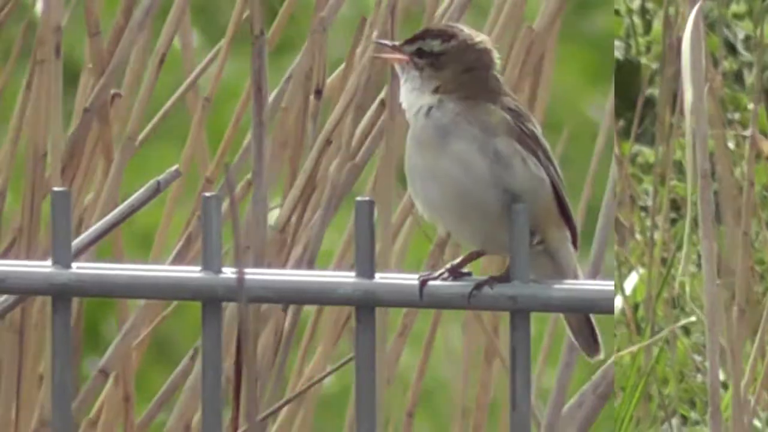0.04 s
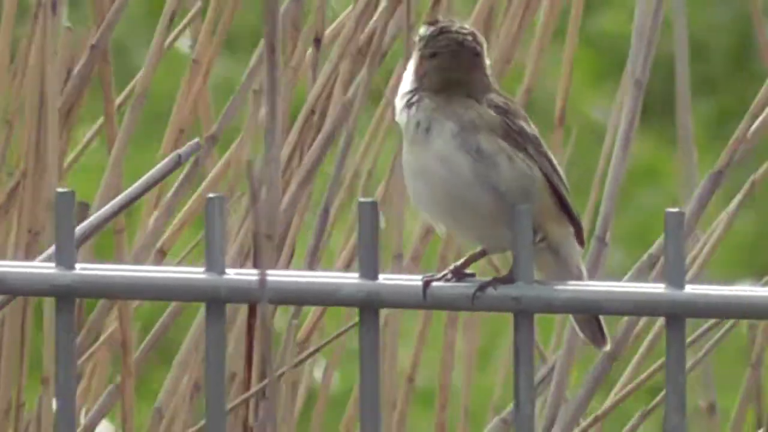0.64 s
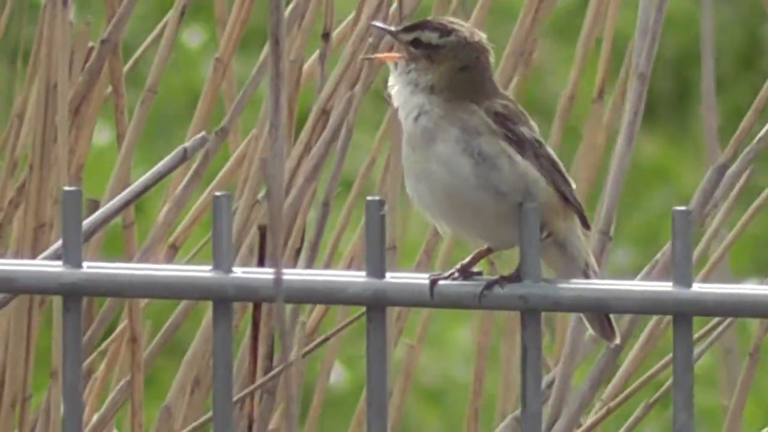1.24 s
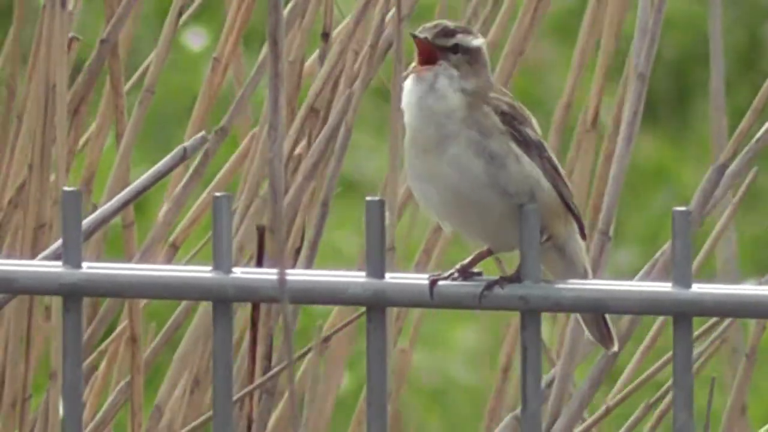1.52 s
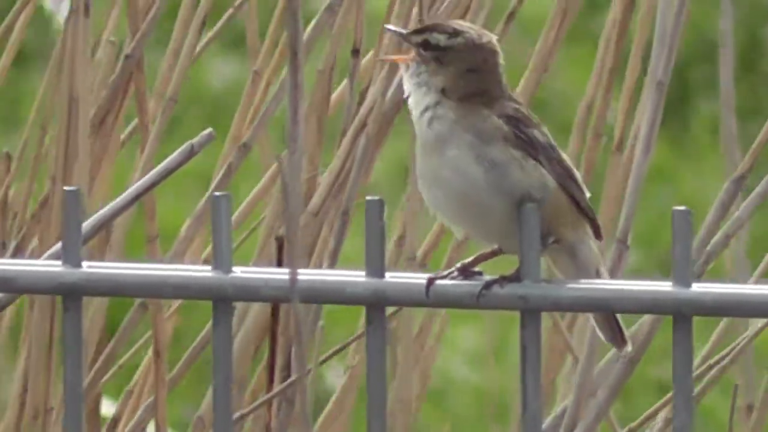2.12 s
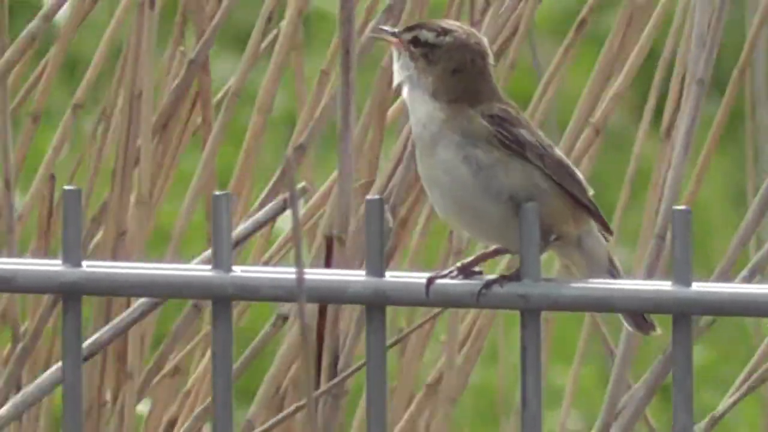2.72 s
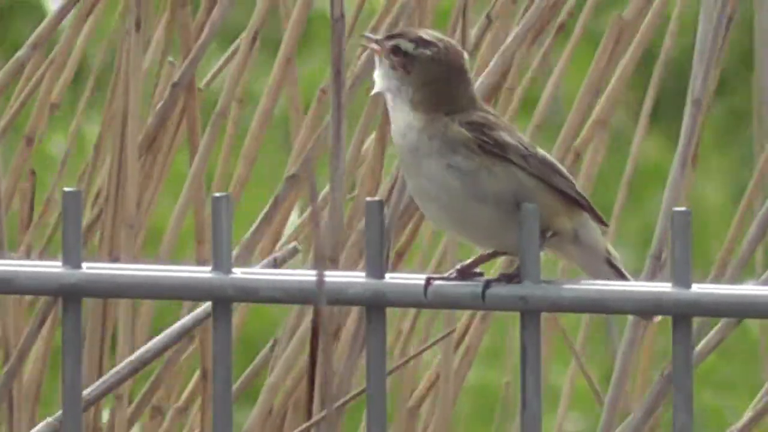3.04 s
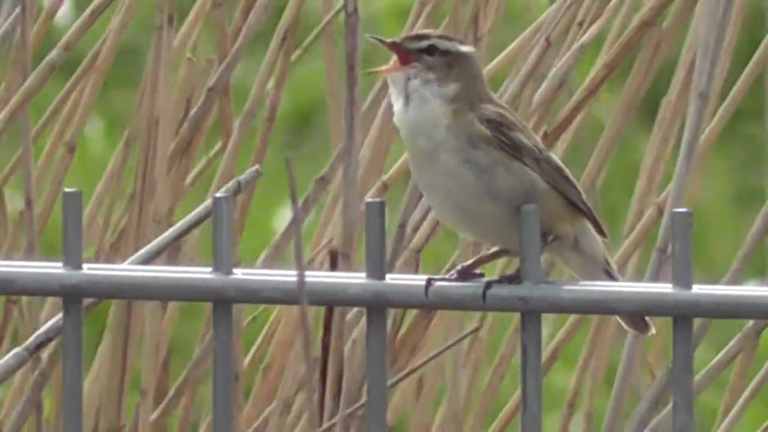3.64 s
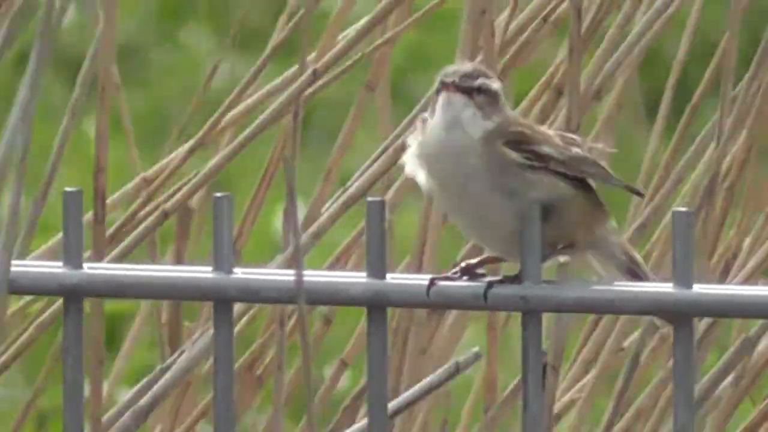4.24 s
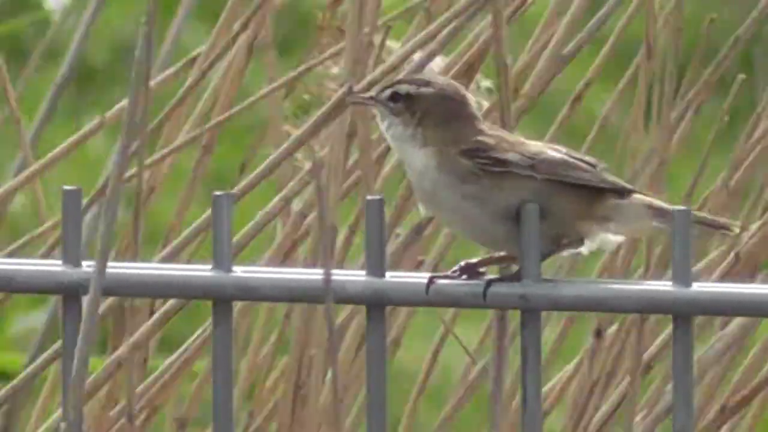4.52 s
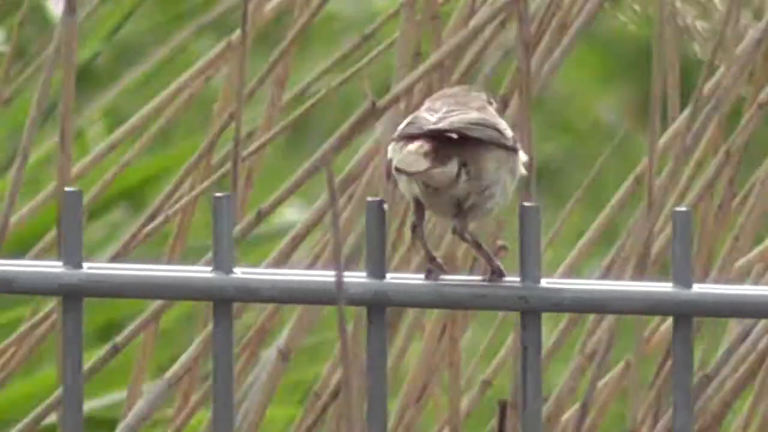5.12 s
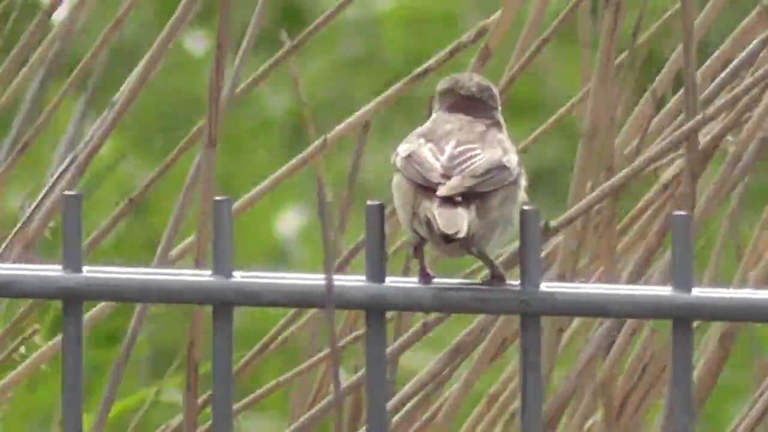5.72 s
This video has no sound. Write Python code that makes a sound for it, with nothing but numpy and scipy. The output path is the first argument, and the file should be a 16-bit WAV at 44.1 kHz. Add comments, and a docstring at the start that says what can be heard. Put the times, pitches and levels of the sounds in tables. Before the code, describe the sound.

Scratchy, chattering song from a small warbler, over low wind rumble on the microphone, a few dull knocks and softly hissing reeds.

```python
"""A gust bumps the microphone and a dry rattle opens the song of a sedge warbler on a wire fence.
Both sides of its syrinx sound at once in runs of harsh chirps, each set by effort and pitch; its
rattles are trains of pulses that slow a little, and three lower chips follow as it turns away.
Wind buffets throughout, dull knocks ring hollow, mostly on the left, and the reed bed hisses.
At the end a farther bird starts a mewing call."""
import sys
import numpy as np
from scipy import signal
from scipy.fft import rfft, irfft, next_fast_len
from scipy.io import wavfile
from scipy.ndimage import uniform_filter1d

SR = 44100
rng = np.random.default_rng(int(sys.argv[2]) if len(sys.argv) > 2 else 0)


def master_out(mix):
    """Clip the mix to full scale and print it as 16-bit PCM to the path in sys.argv[1]."""
    frames = np.transpose(np.atleast_2d(mix))
    ceiling = np.clip(frames, -1, 1)
    pcm = np.round(ceiling * 32767).astype(np.int16)
    wavfile.write(sys.argv[1], SR, pcm)


N = 258426
TIME = np.arange(N) / SR


# delivery along the song: time_s, open_bill_treble_db, sweep_overshoot_hz, sweep_accent_db
DELIVERY = [(.35, -12, 100, 2), (1.1, 0, 100, -.5), (1.55, -0.5, 100, -2), (2.1, 0, 50, 3),
            (2.7, 1, 200, -0.5), (3.7, 0.5, 650, 7), (4, -2, 650, 6), (4.2, -3, 400, 1)]
# weaker mixing tones of the two voices: upper_multiple, lower_multiple
MIXING_TONES = [(2, 0), (0, 3), (1, 2), (2, 1), (3, 0), (1, 3), (2, 2), (1, 4), (4, 0)]
# trim of each mixing tone: level_db
MIXING_TRIMS = [-7, -9, -30, -21, -15.5, -37, -21, -23, -28]

def chirp(s, upper_hz, lower_hz, top_hz, held_db, octave_db, sum_db, sweep_db, top_db):
    """Both sides of the syrinx hold a note and mix; then the upper sweeps up and the lower stops."""
    t = np.arange(-.038, .03, 1 / SR)
    bill_db, overshoot_hz, _ = follow(DELIVERY, s)
    upper, = follow([(-.034, .9 * upper_hz), (-.027, .97 * upper_hz), (-.0095, 1.012 * upper_hz),
                     (-.0045, 1.075 * upper_hz), (0, 4405), (.0065, .985 * top_hz),
                     (.013, top_hz + overshoot_hz), (.021, top_hz - .18 * overshoot_hz)], t)
    lower, = follow([(-.034, .98 * lower_hz), (-.017, lower_hz), (-.006, 1.015 * lower_hz),
                     (0, 1.09 * lower_hz), (.008, 1.33 * lower_hz)], t)
    bend = 1 + .009 * wander(len(t), hz=88)
    high, low = phase_of(upper * bend, jitter=.011), phase_of(lower * bend, jitter=.011)
    upper_db, = follow([(-.037, held_db - 30), (-.027, held_db + 4.5), (-.01, held_db + 1),
                        (-.004, sweep_db), (.004, sweep_db), (.007, top_db + 3.5), (.013, top_db - 3.5),
                        (.018, top_db - 22), (.022, top_db - 25), (.029, top_db - 40)], t)
    duet_db, = follow([(-.037, -28), (-.03, -12), (-.02, -1.5), (-.008, 0), (-.001, -6),
                       (.004, -10.5), (.012, -28), (.02, -70)], t)
    held = from_db(octave_db) * np.cos(2 * low) + from_db(sum_db) * np.cos(high + low)
    # the lower voice's own pitch fades as the sweep starts
    held += from_db(held_db - 7) * np.cos(low) / (1 + np.exp((t + .00076) / .0014))
    # a harder push strengthens the mixing tones; an open bill lets the highest ones out
    push = from_db((held_db + octave_db + sum_db) / 3)
    mixing = sum(from_db(db + bill_db * (m + n > 2)) * np.cos(m * high + n * low)
                 for (m, n), db in zip(MIXING_TONES, MIXING_TRIMS))
    # the voices break into a rasp as the sweep pulls them apart
    rasp = from_db(bill_db - 19.5) * band_noise(len(t), 9500, 14500) * bump(t + .003, width_s=.011)
    rasp += from_db(-11) * band_noise(len(t), 2800, 7800) * bump(t + .004, width_s=.018)
    buzz_hz = np.full(len(t), 900)
    buzz = 1 + .5 * bump(t - .001, width_s=.008) * np.cos(phase_of(buzz_hz, jitter=.2))
    duet = from_db(duet_db + 2.2 * wander(len(t), hz=90)) * (held + push * mixing)
    voice = from_db(upper_db) * buzz * np.cos(high) + duet + push * rasp
    shimmer = 1 + .16 * wander(len(t), hz=1500)
    return s + t[0], voice * shimmer


# a chirp's parts (held upper voice, lower octave, sum tone, sweep, top): base_db, db_per_effort_db
CHIRP_PARTS = [(-43.5, 0.77), (-33, 1), (-35.5, 1.15), (-30, .5), (-29.5, 0.7)]
# how far each part ducks under an accent: db_per_accent_db
ACCENT_DUCK = (0.54, 0, 1, -0.08, 2)

def syrinx(s, effort_db, upper_hz):
    """Pitch and effort set both voices, the sweep's top and each part's level, with a little scatter."""
    accent_db = follow(DELIVERY, s)[2]
    shift_hz = upper_hz - 3700  # away from the usual pitch
    lower_hz = 2580 + .408 * shift_hz + rng.normal(0, 18)
    top_hz = 5427 + .7 * shift_hz + 29.5 * effort_db + rng.normal(0, 70)
    levels_db = [db + growth * effort_db - duck * accent_db + rng.normal(0, 1)
                 for (db, growth), duck in zip(CHIRP_PARTS, ACCENT_DUCK)]
    return upper_hz, lower_hz, top_hz, *levels_db


def rattle_pulse(length, hz, fall, lower_db):
    """A hoarse downward flick with a quick start and a weak lower voice."""
    progress = np.linspace(0, 1, max(round(length * SR), 100))
    pitch = hz * (1 + fall * (.45 - progress))
    high, low = phase_of(pitch, jitter=.05), phase_of(.6 * pitch, jitter=.04)
    rasp_hz = (2550, 4300)
    rasp = .45 * unit(band(band_noise(len(pitch), *rasp_hz), *rasp_hz))
    tone = .75 * np.cos(high) + from_db(lower_db) * np.cos(low) + .08 * np.cos(high + low)
    return np.sin(np.pi * progress ** .75) * (tone + rasp)


# dry rattles: start_s, end_s, first_spacing_s, spacing_growth_s, pulse_length_s, pitch_hz,
# fall_share, lower_voice_db, first_db, last_db, swell_db
RATTLE_CUES = [(.1175, .25, .0173, .00004, .016, 3450, .42, -12, -43.5, -35, .5),
               (2.7768, 3.548, .02496, .00022, .0125, 3460, .22, -15, -40.5, -44.5, 1.8),
               (4.495, 4.917, .0263, .00007, .0125, 3400, .25, -12, -44, -44, 3)]

def rattles():
    """Trains of flicks that slow a little as they go and swell in the middle."""
    out = np.zeros(N)
    for start, end, spacing, growth, length, hz, fall, lower_db, first_db, last_db, swell in RATTLE_CUES:
        s = start
        while s < end:
            progress = (s - start) / (end - start)
            db = first_db + (last_db - first_db) * progress + swell * np.sin(np.pi * progress)
            gain = from_db(db + rng.normal(0, 1.2))
            add(out, s, gain * rattle_pulse(length, hz * rng.normal(1, .04), fall, lower_db))
            s += max(spacing, length)
            spacing += growth
    return out


def chip(s, sweep_db, opening_db, closing_hz, closing_db):
    """A lower two-voiced chirp, closed after a tiny gap by a short pure note."""
    t = np.arange(-.022, .038, 1 / SR)
    upper, upper_db = follow([(-.021, 2646, -40), (-.01, 2833, -16), (-.004, 3225, -.5), (0, 3560, -.5),
                              (.004, 4150, -5.5), (.009, 4290, -35), (.02, 4290, -70)], t)
    lower, lower_db = follow([(-.021, 2014, -22), (-.014, 2140, -7.5), (-.008, 2190, -6.5),
                              (-.002, 2220, -16), (.006, 2400, -35), (.02, 2400, -68)], t)
    bend, note_db = follow([(.012, .96, -40), (.017, .985, -5), (.023, 1, 0), (.029, 1.005, -2),
                            (.037, 1, -35)], t)
    high, low = phase_of(upper, jitter=.025), phase_of(lower, jitter=.018)
    mixing = (np.cos(2 * low) + .18 * np.cos(low) + .32 * np.cos(high + low)
              + .52 * np.cos(2 * high) + .21 * np.cos(3 * low))
    opening = from_db(opening_db + lower_db) * mixing
    sweep = from_db(sweep_db + upper_db) * np.cos(high)
    closing = from_db(closing_db + note_db) * np.cos(phase_of(bend * closing_hz, jitter=.015))
    return s + t[0], opening + sweep + closing


# two runs of harsh chirps: mid_sweep_s, effort_db, upper_pitch_hz
CHIRP_CUES = [(0.365, -3.5, 3770), (0.457, -3.5, 3875), (0.547, -4.5, 3830), (0.641, 1, 3780),
              (0.7434, -2.5, 3810), (0.843, -2, 3840), (0.9337, -2.5, 3790), (1.0288, 0, 3730),
              (1.1214, -0.5, 3820), (1.2161, 1, 3760), (1.3117, 2, 3748), (1.4034, 1.5, 3755),
              (1.501, 3, 3800), (1.599, 1.5, 3725), (1.6948, 2.5, 3736), (1.787, 1.5, 3644),
              (1.886, 3, 3634), (1.9725, 2, 3574), (2.065, 0.5, 3540), (2.1447, 0, 3650),
              (2.2324, -1, 3540), (2.326, -1.5, 3450), (2.41, -3, 3570), (2.5046, -2, 3610),
              (2.5994, -2.3, 3680), (2.697, -10, 3520), (3.7253, 4.5, 3570), (3.811, 4.5, 3557),
              (3.9076, 4, 3620), (3.994, 5.5, 3500), (4.136, 1, 3640), (4.2431, 0.5, 3530)]
# the parting chips: mid_sweep_s, sweep_db, opening_db, closing_pitch_hz, closing_db
CHIP_CUES = [(5.544, -31.5, -28, 3050, -34), (5.665, -31, -30.5, 3134, -32.5),
             (5.763, -30.5, -29, 3120, -33)]
# a soft upward slur into the second run: time_s, pitch_hz, level_db
LEAD_IN_SLUR = [(3.606, 2890, -39), (3.612, 3150, -44), (3.624, 3430, -38), (3.631, 4330, -34.5),
                (3.637, 4440, -44), (3.642, 4660, -61.5)]
# early reflections off the fence and the ground: delay_s, gain
REFLECTIONS = [(.00312, .45), (.0011, .08)]

def warbler():
    """The whole song, dead centre, with its close reflections and a thin ring from the reeds."""
    song = rattles()
    for s, effort_db, hz in CHIRP_CUES:
        add(song, *chirp(s, *syrinx(s, effort_db, hz)))
    for cue in CHIP_CUES:
        add(song, *chip(*cue))
    add(song, *whistle(LEAD_IN_SLUR, octave_db=-18, jitter=.056))
    close = song.copy()
    for delay, gain in REFLECTIONS:
        add(close, delay, gain * song)
    return close + reed_scatter(song, t60=.05, wet_db=-14) + reed_scatter(song, t60=.26, wet_db=-11)


# the light wind that never stops: time_s, level_db
BREEZE_FADER = [(0.0, -30), (0.33, -38), (0.72, -44), (1.31, -49), (1.55, -40.5), (2.74, -46),
                (3.12, -32.5), (3.34, -36), (3.65, -40), (3.98, -34.5), (4.23, -48), (5.07, -40.5),
                (5.7, -37), (5.86, -35.5)]
# gusts that strike the microphone: start_s, length_s, buffet_db, rumble_db
GUST_CUES = [(0, .11, -32.5, -47), (0.127, 0.051, -48, -55), (0.477, 0.089, -26.5, -26),
             (1.452, 0.19, -34, -32), (2.09, 0.22, -38.5, -34), (3.11, 0.072, -42, -36.5),
             (3.184, 0.12, -19.5, -47), (3.315, 0.14, -24, -34), (3.484, 0.17, -34.5, -48),
             (3.916, 0.15, -25.5, -33), (5.4, 0.059, -26, -28), (5.484, 0.022, -32, -28),
             (5.636, 0.26, -30, -26)]

def wind_strength(attack_s=.01, release_s=.017):
    """Rumble and buffet in dB: each gust rises, holds and dies away on top of the breeze."""
    breeze_db, = follow(BREEZE_FADER, TIME)
    power = from_db(breeze_db - 2.5) ** 2
    for start, length, buffet_db, rumble_db in GUST_CUES:
        t = TIME - start
        swell = np.clip(t / attack_s, 0, 1) * np.exp(-np.maximum(t - length, 0) / release_s)
        power = power + (from_db([[rumble_db], [buffet_db]]) * swell) ** 2
    return 10 * np.log10(power)


# the wind's three colours, low to high: frequency_hz, relative_db
RUMBLE_EQ = [(15, -28), (28, -23), (45, -10), (65, -1), (95, -1), (125, -9), (200, -35), (500, -66)]
BUFFET_EQ = [(50, -61), (90, -19.5), (120, 1), (170, -0.5), (240, -8.5), (350, -14.5), (600, -35.5),
             (1200, -59), (4000, -65)]
FLUTTER_EQ = [(120, -31), (230, -1.5), (320, -7), (450, -5.5), (700, -17), (1200, -28), (2500, -51),
              (5000, -80)]
# the slow rumble reaches both ports much alike: frequency_hz, correlation
RUMBLE_STEREO = [(30, .92), (100, .72)]
# the side the wind comes from: time_s, left_over_right_db
WIND_PAN = [(0, -2), (.5, -1), (1.5, 1), (2.6, -0.5), (3.25, 0.5), (4, -2.5), (4.6, 1), (5.4, 0), (5.8, -1)]
# single eddies that pop on the microphone: peak_s, level_db, pitch_hz
EDDY_POPS = [(.013, -26, 150), (0.09, -23, 170), (0.504, -10, 179), (.536, -9, 147), (1.218, -17.5, 119),
             (1.579, -13, 135), (2.558, -19, 104), (3.214, -16, 164), (3.266, -10.5, 174),
             (3.295, -26, 310), (3.383, -11.5, 230), (3.942, -12.5, 153), (4.015, -6, 132),
             (4.702, -19, 83), (4.813, -16.5, 120), (5.085, -12.5, 125), (5.4, -13, 130), (5.448, -6, 167),
             (5.658, -11, 150), (5.709, -7, 126), (5.777, -8.5, 131)]

def wind():
    """Turbulence at the microphone's two ports: rumble, buffets that brighten as they grow, eddies."""
    rumble_db, buffet_db = wind_strength()
    flutter_db = buffet_db - 4 + .79 * (buffet_db + 23.5)
    side_db, = follow(WIND_PAN, TIME)
    rumble = from_db(rumble_db) * noise_pair(RUMBLE_EQ, RUMBLE_STEREO)
    buffet = from_db(buffet_db) * noise_pair(BUFFET_EQ, correlation=[(120, .57), (300, .76)])
    flutter = from_db(flutter_db) * noise_pair(FLUTTER_EQ, correlation=[(250, -.19), (600, -.85)])
    puffs = from_db(3.37 * wander(N, hz=49))
    out = panned(rumble + puffs * (buffet + flutter), side_db)
    t = np.arange(-.03, .03, 1 / SR)
    for s, db, hz in EDDY_POPS:
        port_phases = 2 * np.pi * rng.random() + rng.normal(0, 1.01, (2, 1))
        pop = bump(t, width_s=.51 / hz) * np.cos(2 * np.pi * hz * t + port_phases)
        add(out, s + t[0], from_db(db) * pop)
    return out


def scuff(length):
    """A brief scrape whose energy is spread evenly over all frequencies."""
    swell = signal.windows.tukey(max(round(length * SR), 100), .4)
    force = rng.standard_normal(len(swell)) * swell
    for _ in range(2):
        flat_spectrum = np.exp(1j * np.angle(rfft(force, 2 * len(swell))))
        force = irfft(flat_spectrum)[:len(swell)] * swell
    return force


# dull knocks: start_s, level_db, length_s, left_over_right_db, tail_db, tuning_ratio
KNOCK_CUES = [(.002, -36, 0.013, -6, -32, 1), (0.078, -38.5, 0.018, -9, -27, 0.73),
              (0.27, -30.5, 0.029, 8, -12, 0.93), (0.282, -24, 0.016, 7, -11, 0.86),
              (0.452, -31, 0.015, 5.5, -14, 0.69), (1.701, -27, 0.017, 9.5, -13.5, 0.93),
              (1.874, -39.5, 0.015, 11, -9.5, 0.76), (2.099, -34.5, 0.033, 5, -11, 0.98),
              (2.302, -36, 0.021, 7, -15, 0.8), (2.649, -17.5, 0.011, 5.5, -32, 0.96),
              (2.656, -16, .011, 8.5, -17, 1.002), (2.823, -32, 0.015, 6.5, -8, 0.91),
              (3.416, -23.5, 0.019, 6, -13, 1.04), (3.425, -27, 0.023, 6, -16, 1.14),
              (3.975, -39.5, 0.041, -2, -14, 1.13)]
# the resonances they ring with: pitch_hz, width_hz, level_db
KNOCK_MODES = [(262, 120, 8.5), (535, 90, -1), (750, 190, 8), (1400, 450, -8.5), (1950, 400, -20),
               (2350, 600, -21)]

def knocks(port_shift_rad=.66):
    """Short scuffing blows into a few low resonances; the two ports hear them out of step."""
    t = np.arange(SR // 8) / SR
    out, lingering = np.zeros((2, N)), np.zeros(N)
    port_shift = np.exp(1j * np.array([[0], [port_shift_rad]]))
    for s, db, length, side_db, tail_db, tuning in KNOCK_CUES:
        # steep resonances with deep valleys between them make the blow hollow
        body = np.zeros(len(t))
        for k, (hz, width, mode_db) in enumerate(KNOCK_MODES):
            envelope = from_db(mode_db) * width ** 2 * t * np.exp(-np.pi * width * t)
            body += (-1) ** k * envelope * np.sin(2 * np.pi * tuning * hz * t)
        blow = signal.hilbert(signal.fftconvolve(scuff(length), band(body, 152, 4000)))
        blow *= from_db(db) * np.sqrt(length * SR) / np.linalg.norm(blow.real)
        add(out, s, panned((blow * port_shift).real, side_db))
        add(lingering, s + length / 2, from_db(db + tail_db) * unit(band(scuff(length), 260, 950)))
    return out + reed_scatter(lingering, t60=.48, wet_db=4.5)


# the far bird's mew: time_s, pitch_hz, level_db
MEW_GLIDE = [(5.63, 1270, -64.5), (5.665, 1404, -46), (5.71, 1500, -50), (5.75, 1565, -48.5),
             (5.79, 1587, -48), (5.825, 1550, -42.5), (5.86, 1496, -35)]

def far_bird():
    """A clean arched mew with a weaker second voice above it."""
    second_voice = [(5.635, 1964, -50.5), (5.665, 2210, -52), (5.69, 2140, -56),
                    (5.735, 2320, -51), (5.78, 2350, -66)]
    call = np.zeros(N)
    add(call, *whistle(MEW_GLIDE, octave_db=-32.5, jitter=.00264))
    add(call, *whistle(second_voice, octave_db=-30, jitter=.0052))
    return call + reed_scatter(call, t60=.4, wet_db=-9)


# the hiss of the reeds, ridden around its own average: time_s, relative_db
HISS_FADER = [(0, -59.5), (.4, -53), (1.6, -58), (2.5, -54), (2.75, -56.5), (3.1, -53.5), (3.3, -59.5),
              (3.55, -54), (3.9, -52), (5.1, -50), (5.86, -52)]
# colour of the open air: frequency_hz, relative_db
AIR_EQ = [(60, -7), (130, -1.5), (300, -4.5), (500, -7), (1200, -17.5), (2400, -22.5), (3100, -23.5),
          (4800, -27), (8800, -26.5), (12500, -28), (14300, -32.5), (15600, -38)]
# its stereo image: frequency_hz, correlation
AIR_STEREO = [(100, 1), (600, 0.72), (1500, 0.55), (3000, 0.85), (6000, 1), (9000, 1), (13000, 0.3)]

def reeds(air_db=-43, crossover_hz=4500):
    """A steady bed of open air; the hiss of the reeds swells and sinks above it."""
    hiss_db, = follow(HISS_FADER, TIME)
    air = from_db(air_db) * noise_pair(AIR_EQ, AIR_STEREO)
    bed = signal.sosfiltfilt(signal.butter(2, crossover_hz, fs=SR, output="sos"), air)
    swell = from_db(hiss_db - hiss_db.mean() + .44 * wander(N, hz=35))
    return bed + (air - bed) * swell


def reed_scatter(x, t60, wet_db):
    """Scatter from the stems: a thin reverb tail, different in each ear."""
    t = np.arange(SR // 2) / SR
    taps = rng.standard_normal((2, len(t))) * (rng.random((2, len(t))) < .1)
    tail = (taps + .82 * taps[::-1]) * from_db(-60 * t / t60) * (1 - np.exp(-t / .003))
    tail /= np.linalg.norm(tail[0])
    return from_db(wet_db) * signal.fftconvolve(x[None], tail, axes=1)[:, :N]


def whistle(glide, octave_db, jitter):
    """One gliding note with its octave; returns start time and sound."""
    t = np.arange(glide[0][0], glide[-1][0], 1 / SR)
    hz, db = follow(glide, t)
    phase = phase_of(hz, jitter)
    return t[0], from_db(db) * (np.cos(phase) + from_db(octave_db) * np.cos(2 * phase))


def phase_of(hz, jitter):
    """Phase of one side of the syrinx, whose pitch trembles by the share jitter."""
    tremble = 1 + jitter * wander(len(hz), hz=900)
    return 2 * np.pi * np.cumsum(uniform_filter1d(hz, size=90) * tremble) / SR


def noise_pair(eq, correlation):
    """Two channels of coloured noise that are partly the same, at rms 1."""
    size = next_fast_len(N)
    hz = np.fft.rfftfreq(size, 1 / SR)
    left, other = rfft(rng.standard_normal((2, size)))
    alike = np.clip(over_hz(correlation, hz), -1, 1)
    right = alike * left + np.sqrt(1 - alike ** 2) * other
    return unit(irfft(np.array([left, right]) * from_db(over_hz(eq, hz)), size)[:, :N])


def wander(size, hz):
    """Smooth random drift of rms 1 that moves up to about hz times a second."""
    f = np.fft.rfftfreq(size, 1 / SR)
    return unit(irfft(rfft(rng.standard_normal(size)) * np.exp(-(f / hz) ** 2), size))


def band(x, low_hz, high_hz):
    """A gentle band-pass."""
    return signal.sosfilt(signal.butter(2, [low_hz, high_hz], "band", fs=SR, output="sos"), x)


def band_noise(size, low_hz, high_hz):
    """Band-passed noise of rms 1."""
    return unit(band(rng.standard_normal(size), low_hz, high_hz))


def bump(t, width_s):
    """A bell-shaped envelope that peaks at t = 0."""
    return np.exp(-(t / width_s) ** 2)


def follow(rows, t):
    """Each column of a curve table at the times t."""
    s, *columns = np.transpose(rows)
    return [np.interp(t, s, c) for c in columns]


def over_hz(points, hz):
    """A spectrum table read on a log-frequency axis."""
    f, value = np.transpose(points)
    return np.interp(np.log(hz + 1), np.log(f + 1), value)


def add(mix, s, sound):
    """Mixes a sound in at time s."""
    part = mix[..., max(round(s * SR), 0):][..., :sound.shape[-1]]
    part += sound[..., :part.shape[-1]]


def panned(x, side_db):
    """Leans a sound to the left by side_db."""
    return np.array([from_db(side_db / 2), from_db(-side_db / 2)]).reshape(2, -1) * x


def from_db(db):
    """Decibels to gain."""
    return 10 ** (np.asarray(db) / 20)


def unit(x):
    """Scales to rms 1."""
    return x / np.sqrt(np.mean(x ** 2) + 1e-20)


def scene():
    """The full stereo mix at the microphone."""
    return warbler() + far_bird() + knocks() + wind() + reeds()


def record(dry):
    """A steep high cut takes off the very top."""
    cutoff_hz = 15650
    high_cut = signal.firwin(511, cutoff_hz, window=("kaiser", 9), fs=SR)
    return signal.oaconvolve(dry, high_cut[None], "same")


dry = scene()
out = record(dry)
master_out(out)
```